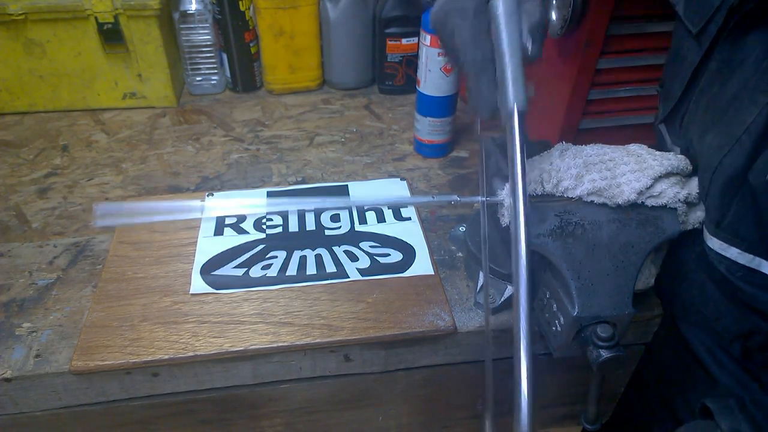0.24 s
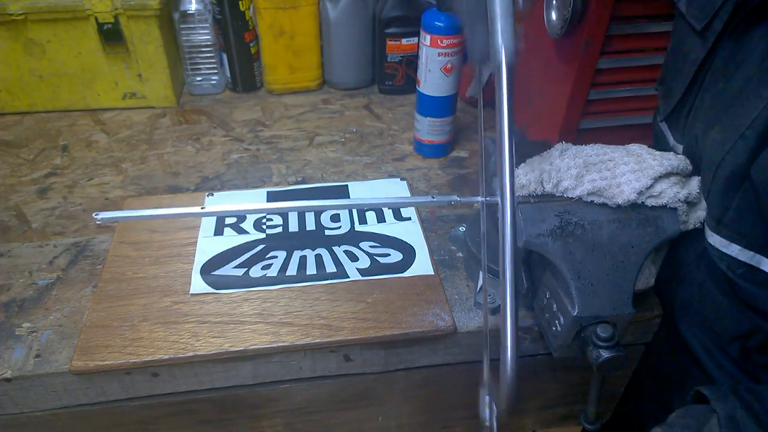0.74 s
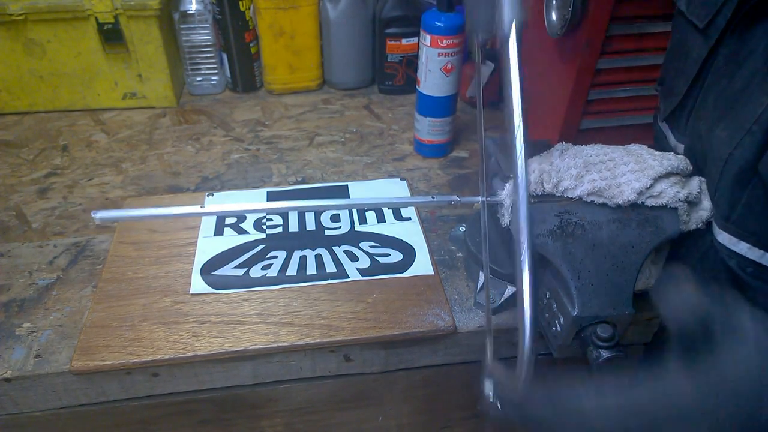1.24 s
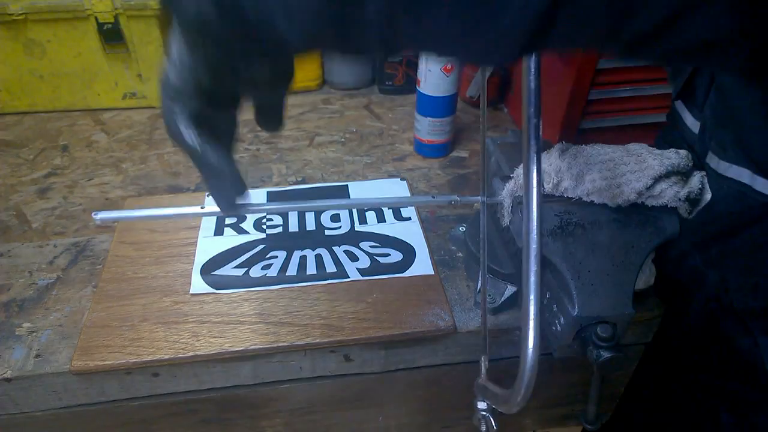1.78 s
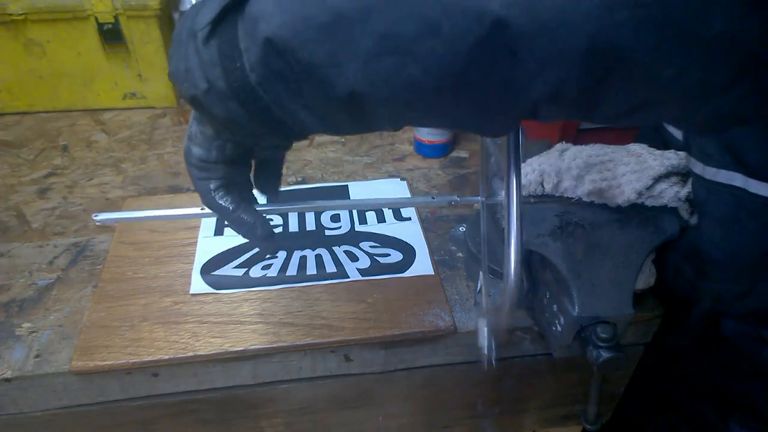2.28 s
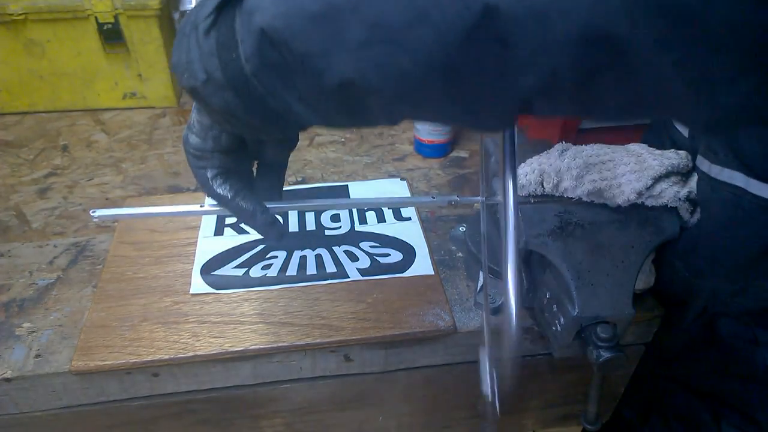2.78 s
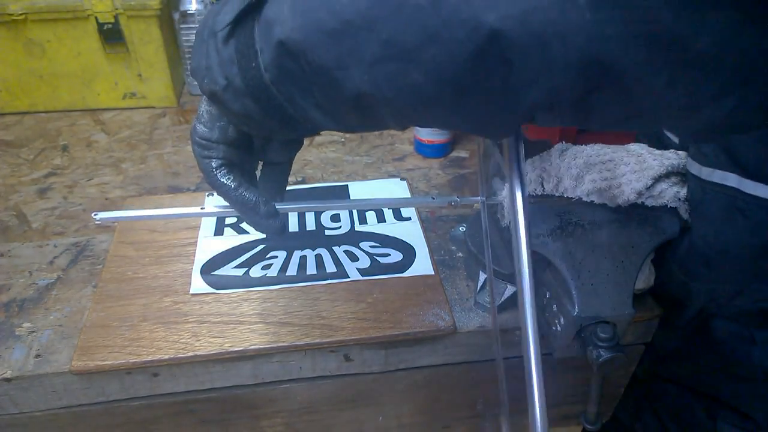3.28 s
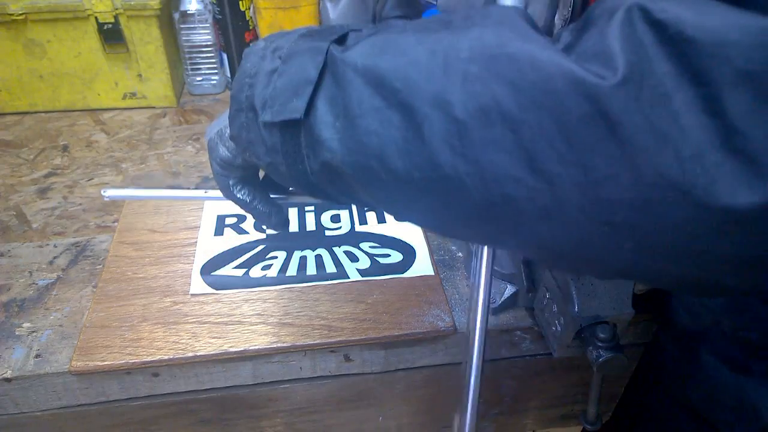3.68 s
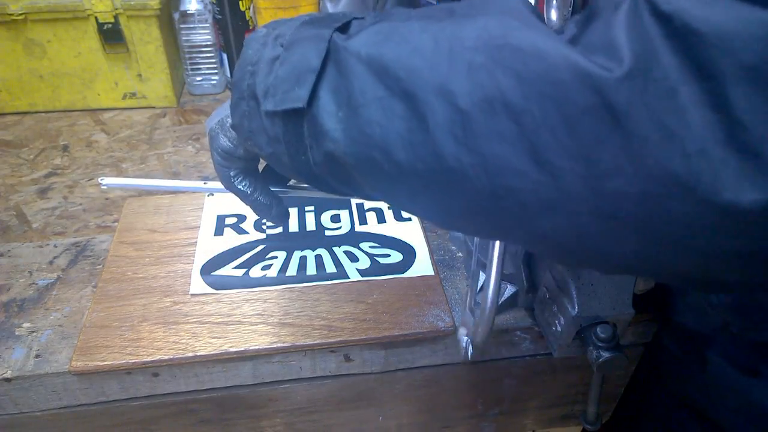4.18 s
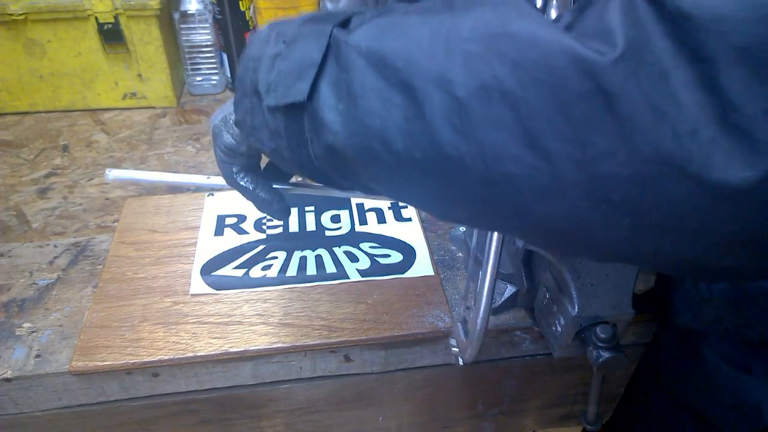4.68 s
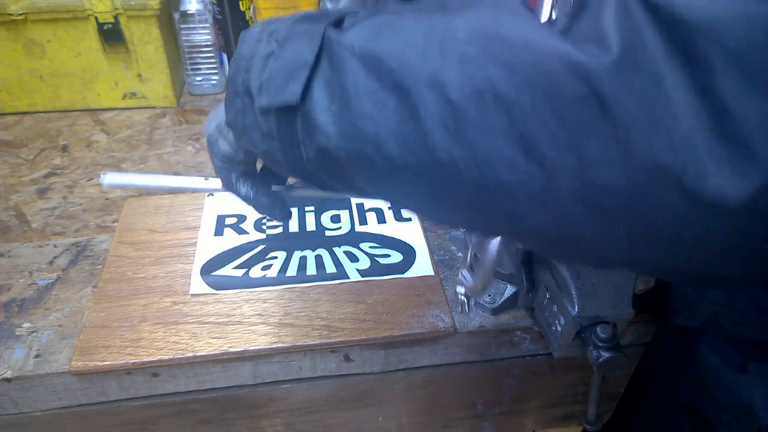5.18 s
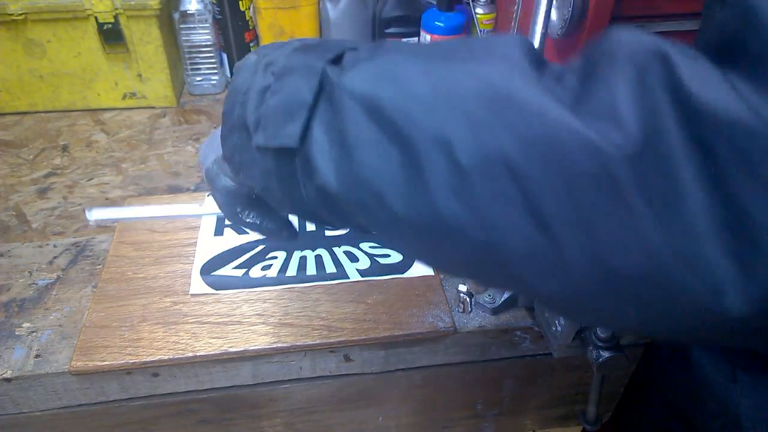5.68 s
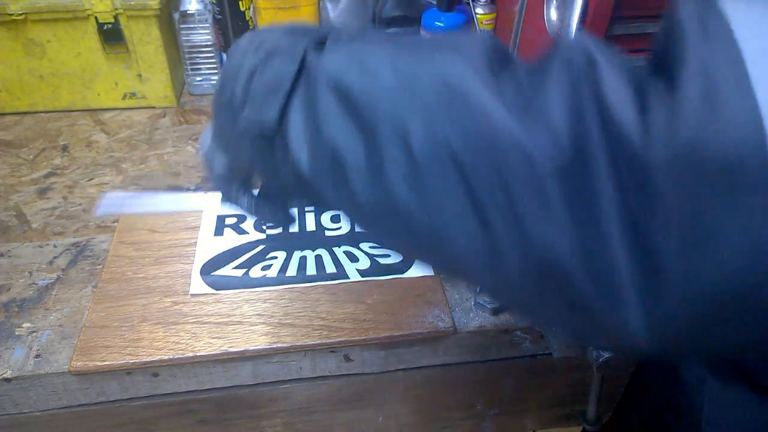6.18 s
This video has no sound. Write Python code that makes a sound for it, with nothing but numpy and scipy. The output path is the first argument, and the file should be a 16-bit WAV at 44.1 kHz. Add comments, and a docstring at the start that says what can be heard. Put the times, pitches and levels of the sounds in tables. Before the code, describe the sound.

Fast, bright metallic sawing with low bench thumps in a small workshop, a short break with cloth rustle, more strokes, then small clinks.

```python
"""A hacksaw cuts a thin aluminium rod in a bench vise, about four and a half strokes a second.
Random tooth catches over steady rubbing make one noisy force that excites blade and rod resonances.
Noise through low resonances rocks the wooden bench under the effort and hums in the vise.
The sawyer pauses to take hold of the rod, filtered noise brushing as a sleeve, and cuts through.
Decaying sines clink rod and loose end, the saw drags clear, and a short room and still air surround it."""
import sys
import numpy as np
from scipy import signal
from scipy.fft import rfft, irfft
from scipy.io import wavfile
from scipy.ndimage import uniform_filter1d

SR = 44100
rng = np.random.default_rng(int(sys.argv[2]) if len(sys.argv) > 2 else 0)


def generate_wav(signal):
    """Clip the signal to [-1, 1] and save it as 16-bit WAV at the path in sys.argv[1]."""
    frames = np.transpose(np.atleast_2d(signal))
    scaled = np.clip(frames, -1, 1) * 32767
    pcm = np.round(scaled).astype(np.int16)
    wavfile.write(sys.argv[1], SR, pcm)


N = 284002
TIME = np.arange(N) / SR  # s
FREQ = np.fft.rfftfreq(N, 1 / SR)  # Hz

# Passes of the blade. Each row: start in seconds, length in seconds, moment of top speed as a share
# of the length (0-1), drive of the blade in dB, drive of the rod in dB, fizz relative to the blade in dB.
STROKES = [(-0.005, 0.016, 0.12, -3.5, -8.5, -13.5), (0.077, .31, 0.39, -19, -26, -12),
           (0.408, 0.2, 0.4, -18, -27, -7.5), (0.618, 0.21, 0.52, -19.5, -27.5, -12),
           (0.86, 0.21, 0.34, -18.5, -27.5, -6.5), (1.108, 0.15, 0.38, -19.5, -25, -11.5),
           (1.301, 0.39, 0.16, -34.5, -38, -5), (1.814, .1, 0.48, -21, -31.5, -7),
           (1.924, 0.27, 0.58, -27.5, -31.5, -9.5), (2.211, .18, 0.51, -22.5, -31, -13),
           (2.476, 0.16, 0.29, -22.5, -27.5, -10), (2.661, 0.19, 0.53, -24.5, -32.5, -9),
           (2.924, 0.13, 0.23, -19.5, -26.5, -10.5), (3.097, 0.18, 0.61, -23.5, -29, -10.5),
           (3.347, 0.19, 0.26, -21, -29, -10.5), (3.505, 0.088, 0.48, -28.5, -29.5, -8),
           (3.617, .15, 0.36, -23.5, -30, -8.5), (3.809, 0.21, 0, -21.5, -26.5, -10.5),
           (3.978, 0.12, 0.46, -23.5, -26, -12.5), (4.163, .1, .35, -21, -25, -10.5),
           (4.335, 0.14, 0.55, -26.5, -26.5, -8.5), (4.513, 0.07, 0.37, -28, -31, -7.5),
           (4.701, 0.22, 0, -30.5, -30.5, -9.5), (4.975, 0.15, 0.48, -52, -50.5, -7),
           (5.332, 0.19, 0.07, -63, -68, -12), (5.537, 0.075, 0.34, -51.5, -49.5, -5),
           (5.911, 0.26, 0.48, -40.5, -45, -9), (6.109, 0.13, 0.61, -35.5, -44, -5.5),
           (6.241, 0.064, 0.46, -28, -45, -8.5)]
# Shoves that jolt the bench. Each row: start in seconds, length in seconds, sway of the frame in dB,
# drumming of the top in dB, hum of the vise in dB.
JOLTS = [(-.021, 0.046, -31, -40, -13.5), (.17, 0.17, -30, -29, -28.5), (.477, 0.079, -31, -50, -17),
         (0.729, 0.053, -33, -42, -20.5), (0.976, 0.1, -17, -32, -29), (1.166, 0.12, -14, -21, -30.5),
         (1.406, 0.072, -17, -45, -29.5), (1.982, 0.08, -6, -27.5, -26.5),
         (2.134, 0.046, -36, -24.5, -26.5), (2.355, 0.068, -11.5, -26, -30.5), (2.571, 0.15, -16, -35, -39),
         (2.804, 0.054, -42, -79, -27), (3.008, 0.088, -16, -19, -28.5), (3.248, 0.066, -8.5, -27, -27.5),
         (3.395, 0.17, -23, -29.5, -26), (3.845, 0.065, -35, -14.5, -24), (4.036, 0.08, -18.5, -17, -28),
         (4.225, 0.056, 0, -27, -24.5), (4.354, 0.11, -16, -22, -31.5), (4.545, .049, -3.5, -29, -30.5),
         (4.701, 0.11, -13, -21, -26.5), (4.848, 0.055, -9.5, -32, -39), (4.962, 0.12, -20, -60, -42.5),
         (5.128, 0.035, -20, -46, -51), (6.081, .15, -22, -31, -36.5)]


def saw():
    """Forced vibration: one tooth force drives the resonances of blade, clamped rod and thinning neck."""
    # Resonances. Each row: centre in Hz, offset in Hz at which the gain has halved, relative level in dB.
    blade_modes = [(2462, 82, 0.5), (2920, 34, -3.5), (3280, 100, -0.5), (3642, 105, -4), (3673, 26.5, 3.5),
                   (4230, 74, -6.5), (5476, 140, -2.5), (6218, 265, -1), (6680, 245, -3.5)]
    sing_modes = [(5990, 114, -2.5), (6146, 130, 4.5), (6332, 43, 3.5), (8430, 177, -13), (10810, 260, -18),
                  (13740, 350, -25.5), (15500, 450, -24)]
    fizz_modes = [(8480, 750, 0.5), (9900, 92, -0.5), (10920, 350, -2.5), (14190, 44, -7)]
    rod_modes = [(470, 25, -4.5), (550, 30, -2.5), (642, 32, 0.5), (704, 23, 2.5), (784.4, 28, 4.5),
                 (864, 40, -1), (930, 42, 2), (1064, 36, -0.5), (1143, 54, -4), (1363, 43, -1.5),
                 (1494, 35, -3), (1890, 190, -9.5)]
    neck_modes = [(1198, 28, 13.5), (1291, 49, 7.5), (2040, 28, -10.5)]
    # Broad colour beneath the resonances. Each row: frequency in Hz, relative level in dB.
    blade_colour = [(1000, -59), (1700, -13), (2200, -19), (2500, -5), (3600, -3), (3900, -4.5),
                    (4600, -4.5), (6800, -10), (7300, -19), (9000, -64.5)]
    fizz_colour = [(5500, -51), (7200, -2), (7700, -9), (9000, -9), (11500, -5.5), (12200, -6),
                   (15700, -15)]
    rod_colour = [(150, -33), (300, -7), (450, -8), (850, -2), (1050, -10.5), (1400, -5), (1700, -17),
                  (2300, -14.5), (4000, -51.5)]
    # Balance as the rod is held and the cut deepens. Each row: time in seconds,
    # thin neck relative to the rod in dB, singing relative to the rest of the blade in dB.
    cut = [(0, -12, -3), (1.3, -17.5, -2), (2.1, -13.5, -1), (3.2, -22.5, -28.5), (3.7, -3.5, -3.5),
           (4.45, -3.5, -1.5), (5, -11, -25.5), (6.2, -7.5, -2.5)]
    # Teeth snagging on the edge of the cut. Each row: time in seconds, jump in force in dB.
    snags = [(1.831, 1), (2.483, 5), (3.536, 7), (6.05, 4), (6.102, 9), (6.151, 7), (6.189, 8.5),
             (6.259, 9)]
    power, release_s = 1.18, 0.04  # exponent on the arch of speed; time constant of the lag
    resting_db = -70  # the blade barely moving between strokes

    rub_rows = [(*timing, blade_db) for *timing, blade_db, _, _ in STROKES]
    bite_rows = [(*timing, blade_db + fizz_db) for *timing, blade_db, _, fizz_db in STROKES]
    rubbing = np.hypot(pushes(rub_rows, power, release_s), amp(resting_db))
    biting = pushes(bite_rows, power, release_s)
    speed = np.sqrt(rubbing / rubbing.max())  # relative, inferred from the level

    force = teeth(speed, catches_per_s=1100, spread_db=1.0, chip_s=0.00035, rub_db=6)
    snagging = 1
    for s, db in snags:
        snagging = snagging + (amp(db) - 1) * (TIME >= s) * np.exp(-abs(TIME - s) / 0.014)
    force = force * snagging

    blade = wander(body(force, blade_colour, blade_modes), patchy_db=2.5, patch_hz=220, patch_s=0.082)
    sing = wander(body(force, modes=sing_modes), patchy_db=4, patch_hz=149.3, patch_s=0.12)
    fizz = wander(body(force, fizz_colour, fizz_modes), patchy_db=2.5, patch_hz=250, patch_s=0.037)
    rod = wander(body(force, rod_colour, rod_modes), patchy_db=3.5, patch_hz=130, patch_s=0.087)
    neck = body(force, modes=neck_modes)

    neck_db, sing_db = along(cut)
    steel = (blade + amp(sing_db) * sing) / np.hypot(1, amp(sing_db))
    chips = speed ** 0.42 * fizz  # a slow blade sounds duller
    aluminium = (rod + amp(neck_db) * neck) / np.hypot(1, amp(neck_db))
    return rubbing * steel + biting * chips + pressure() * aluminium


def pressure():
    """Contact loading: how hard the teeth bear on the clamped rod, stroke by stroke."""
    rows = [(*timing, rod_db) for *timing, _, rod_db, _ in STROKES]
    return pushes(rows, power=0.9, release_s=0.045)


def teeth(speed, catches_per_s, spread_db, chip_s, rub_db):
    """Shot noise: random catches, more frequent at speed, each tear a brief chip over steady rubbing."""
    caught = rng.random(N) < catches_per_s * speed / SR
    size = amp(spread_db * np.minimum(rng.exponential(1, N), 4))
    keep = np.exp(-1 / (chip_s * SR))
    tearing = signal.lfilter([1], [1, -keep], (caught * size) ** 2)  # power decaying after each catch
    force = np.sqrt(tearing / tearing.mean() + amp(rub_db) ** 2)
    return steadied(force * noise_pair(), span=0.09)


def wander(x, patchy_db, patch_hz, patch_s):
    """Moving contact: the colour drifts in time-frequency patches as it slides along the blade."""
    hz, t, z = signal.stft(x, SR, nperseg=1024, noverlap=768)
    bins, frames = max(1, round(patch_hz / hz[1])), max(1, round(patch_s / t[1]))
    patches = uniform_filter1d(rng.standard_normal(z.shape[1:]), bins, axis=0)
    patches = unit(uniform_filter1d(patches, frames, axis=1))
    _, coloured = signal.istft(z * amp(patchy_db * patches), nperseg=1024, noverlap=768)
    return unit(coloured[:, :N])


def pushes(rows, power, release_s):
    """Lagged response: speed rises and falls in one arch a push, and the vibration follows late.

    Each row: start in seconds, length in seconds, peak as a share of the length, drive in dB."""
    drive = np.zeros(N)
    for start, length, peak, db in rows:
        during = (TIME > start) & (TIME < start + length)
        warp = np.log(0.5) / np.log(np.clip(peak, 0.05, 0.95))  # puts the top of the arch at the peak
        phase = ((TIME[during] - start) / length) ** warp
        drive[during] += amp(db) * np.sin(np.pi * phase).clip(0) ** power
    keep = np.exp(-1 / (release_s * SR))
    return signal.lfilter([1 - keep], [1, -keep], drive)


def bench():
    """Structure-borne sound: effort rocks the heavy frame, drums the wooden top and hums in the vise."""
    # Resonances. Each row: centre in Hz, offset in Hz at which the gain has halved, relative level in dB.
    frame_modes = [(29.7, 4.8, -3.5), (45.4, 17.5, 18.5), (62.5, 8.9, -2.5), (83, 21, -20)]
    top_modes = [(124.2, 17.4, 3.5), (146, 21, -10.5)]
    vise_modes = [(193.2, 9.7, -1.5), (238, 12.4, -12.5), (283.6, 9.5, -17.5)]
    # Broad colour beneath the resonances. Each row: frequency in Hz, relative level in dB.
    frame_colour = [(8, -38.5), (22, -2), (80, 11), (130, -92.5)]
    top_colour = [(50, -51.5), (105, -19), (160, -23), (260, -73)]
    vise_colour = [(110, -47), (170, -28.5), (400, -29.5), (900, -64)]
    sway_share_db, drum_share_db, hum_share_db = -1, -17, -25.5  # each part's share of the steady rocking
    grip_db = -7.5  # hum passed from the rod to the vise on every stroke

    sway_db, drum_db, hum_db = np.transpose(JOLTS)[2:]
    sway = steadied(body(noise_pair(), frame_colour, frame_modes), span=0.075)
    drum = steadied(body(noise_pair(), top_colour, top_modes), span=0.19)
    hum = steadied(body(noise_pair(), vise_colour, vise_modes), span=0.042)
    swaying = shaking(sway_db, sway_share_db)
    drumming = shaking(drum_db, drum_share_db)
    humming = np.hypot(shaking(hum_db, hum_share_db), amp(grip_db) * pressure())
    return swaying * sway + drumming * drum + humming * hum


def shaking(jolt_db, share_db):
    """Addition of powers: one bench part's level is its uneven rocking combined with the jolts."""
    # The sawyer's weight working on the bench. Each row: time in seconds,
    # level in dB of the steady rocking before a part's share is applied.
    effort = [(0, -18), (1.5, -29), (1.76, -36.5), (1.95, -26.5), (4.22, -23.5), (4.9, -23), (5.3, -40.5),
              (5.7, -50), (5.95, -57.5), (6.0, -29.5), (6.25, -33), (6.44, -55)]
    lurch_db, lurch_s = 2, 0.11  # rms depth of the uneven lurches; length of the window smoothing them
    settle_s = 0.051  # time constant of the bench coming to rest

    window = signal.windows.hann(int(lurch_s * SR))
    lurch = unit(signal.fftconvolve(rng.standard_normal(N), window, "same"))
    rocking = amp(along(effort)[0] + share_db + lurch_db * lurch)
    rows = [(start, length, 0.5, db) for (start, length, *_), db in zip(JOLTS, jolt_db)]
    return np.hypot(rocking, pushes(rows, 0.73, settle_s))


def clinks():
    """Modal ringing: a grazing contact pumps the modes of rod and stub, which chatter as they decay."""
    # The rod knocked by the blade or, once cut, by its own stub. Each row: start in seconds,
    # rod level in dB, stub level in dB, scrape level in dB, length of contact in seconds.
    contacts = [(1.411, -33, -60, -40, 0.031), (1.52, -37.5, -46, -59, 0.019),
                (5.648, -30.5, -54, -35, .031), (5.747, -35, -28.5, -46, 0.017)]
    # Free ringing. Each row: frequency in Hz, relative level in dB, 60 dB decay time in seconds.
    rod_ring = [(2230, -10.5, 0.2), (3650, 0.5, .2), (5330, 3.5, 0.22), (7040, -6, .25), (7400, -3.5, .12),
                (8970, -7.5, 0.15), (10800, -11, 0.18), (12120, -21, .22), (13520, -24, .2),
                (14560, -23, .22)]
    stub_ring = [(3080, -16, 0.47), (4925, 0, 0.28), (5335, -3, 0.32), (7800, -7, 0.28), (9530, -9.5, .22),
                 (10330, -16, 0.22), (12110, -18, .2), (13790, -23, .2)]
    # Colour of the scrape. Each row: frequency in Hz, relative level in dB.
    scrape_colour = [(300, -3), (1200, 2), (2700, -3.5), (3400, 14), (4400, 1), (6000, 11), (7500, 0.5),
                     (11000, -1), (13000, -11), (15500, -18)]

    force = teeth(1, catches_per_s=1200, spread_db=4.0, chip_s=0.00044, rub_db=-3)
    scrape = body(force, scrape_colour)
    out, t = np.zeros((2, N)), TIME[:SR // 2]
    for s, rod_db, stub_db, scrape_db, length in contacts:
        span = slice(round(s * SR), round(s * SR) + len(t))
        contact = np.sqrt(np.sin(np.pi * np.minimum(t / length, 1)).clip(0))
        rasp = np.minimum(t / 0.0057, 1) * amp(-60 * np.maximum(t - length, 0) / 0.51)
        out[:, span] += amp(scrape_db) * rasp * scrape[:, span]
        for modes, level_db in ((rod_ring, rod_db), (stub_ring, stub_db)):
            for hz, db, t60 in modes:
                swell = signal.fftconvolve(contact, amp(-60 * t / t60))[:len(t)]
                flutter = uniform_filter1d(rng.standard_normal((2, len(t))), size=160)
                chatter = 1 + 0.4 * unit(flutter)
                ring = np.sin(2 * np.pi * (hz * t + rng.random((2, 1))))
                out[:, span] += amp(level_db + db) * swell / swell.max() * chatter * ring
    return out


def sleeve():
    """Friction noise: heavy cloth brushes over the bench as the arm reaches across; near the end the saw, moved
    clear, scrapes on rod and vise with a like noise."""
    # One list per stretch of rubbing: first the arm reaching across, then the saw scraping on rod and vise as
    # it # is moved near the end. Each row: time in seconds, level in dB before a lift of 2.5 dB.
    brushes = [
        [(1.25, -42.5), (1.432, -38), (1.6, -39), (1.762, -51.5), (1.83, -42)],
        [(5.95, -78), (6.006, -54), (6.332, -53), (6.42, -55)],
    ]
    # Colour of the rubbing, cloth and the saw's late scraping alike. Each row: frequency in Hz, relative level
    # in dB.
    cloth_colour = [(150, 3), (350, -1), (600, -2), (1150, -11.5), (1500, -18), (4000, -15), (12000, -30)]

    cloth = body(teeth(0.47, catches_per_s=320, spread_db=-11, chip_s=0.0025, rub_db=7), cloth_colour)
    level = np.zeros(N)
    for rows in brushes:
        during = (TIME > rows[0][0]) * (TIME < rows[-1][0])
        level += amp(along(rows)[0] + 2.5) * during
    return cloth * uniform_filter1d(level, size=2000)


def workshop(x, early_t60, room_t60, room_db):
    """Reverberation: bench-top reflections and a short room tail, different at each microphone."""
    # Sound arriving by reflection. Each row: frequency in Hz, level relative to the direct path in dB.
    scatter = [(150, -51), (350, -14.5), (800, 2), (2000, 6.5), (15000, 0.5)]
    # Balance of the two microphones. Each row: frequency in Hz, left minus right in dB.
    balance_db = [(60, 3.5), (380, 3), (700, 1.5), (1300, 0.5), (2200, -1), (2500, -1.5), (3400, -6.5),
                  (4200, 2.5), (4900, 3), (6100, -8.5), (7200, -5), (8200, -4), (10800, -3.5),
                  (13000, -0.5), (15000, 3.5)]

    early_noise, room_noise = rng.standard_normal((2, 2, N))
    early = unit(early_noise * amp(-60 * TIME / early_t60))
    room = unit(room_noise * amp(-60 * TIME / room_t60))
    scattered = rfft(early + amp(room_db) * room)
    scattered = scattered / np.sqrt(np.mean(abs(scattered) ** 2))
    paths = 1 + amp(across(scatter)) * scattered
    # the room adds ripple but no broad colour
    paths /= np.sqrt(uniform_filter1d(abs(paths) ** 2, size=900, axis=1))
    paths *= amp(np.outer([1, -1], across(balance_db)) / 2)
    response = np.roll(irfft(paths, N), N // 2, axis=1)  # direct sound in the middle
    return signal.fftconvolve(x, response, axes=1)[:, N // 2:N // 2 + N]


def still_air():
    """Ambient noise: random pressure with a fixed spectrum is the still workshop."""
    # Each row: frequency in Hz, relative level in dB per Hz.
    air_colour = [(18, -20), (30, 5), (65, -31.5), (180, -25.5), (328, -28), (1200, -31), (1440, -46.5),
                  (2250, -38), (4090, -67), (6530, -46.5), (15000, -64)]
    return amp(-49.5) * body(noise_pair(), air_colour)


def noise_pair():
    """Spatial coherence: two microphones hear a wide source alike in the bass, unrelated in the treble."""
    # Each row: frequency in Hz, likeness of the microphones (limited below to 0-1).
    likeness = [(60, 1), (130, 1.5), (290, 0.63), (640, 1), (1400, 0.23), (3000, 0)]
    left, other = rfft(rng.standard_normal((2, N)))
    alike = np.clip(across(likeness), 0, 1)
    right = alike * left + np.sqrt(1 - alike ** 2) * other
    return irfft(np.array([left, right]), N)


def body(x, broad=None, modes=()):
    """Linear filtering: a causal minimum-phase body with broad colour and resonances; rms 1."""
    power = np.zeros(len(FREQ)) if broad is None else amp(across(broad)) ** 2
    for hz, width, db in modes:
        power = power + amp(db) ** 2 / (1 + ((FREQ - hz) / width) ** 2) ** 2
    log_gain = np.log(power + 1e-10) / 2
    cepstrum = irfft(log_gain, N) * 2 * (TIME < TIME[N // 2])  # folded forward in time
    phase = rfft(cepstrum).imag
    return unit(irfft(rfft(x) * np.exp(log_gain + 1j * phase), N))


def steadied(x, span):
    """Level equalisation: dividing by the running rms evens out swells slower than span seconds."""
    window = signal.windows.hann(int(span * SR))
    power = signal.fftconvolve(np.mean(x ** 2, axis=0), window / window.sum(), "same")
    return x / np.sqrt(abs(power) + 1e-6)


def across(points):
    """Logarithmic frequency scale: reads (Hz, value) points at every frequency."""
    hz, value = np.transpose(points)
    return np.interp(np.log(FREQ + 1), np.log(hz), value)


def along(rows):
    """Linear interpolation: reads (s, value, ..) rows at every sample, one curve a column."""
    rows = np.array(rows)
    s, *columns = rows[np.argsort(rows[:, 0])].T
    return [np.interp(TIME, s, column) for column in columns]


def amp(db):
    """Level law: decibels to amplitude gain."""
    return 10 ** (np.asarray(db) / 20)


def unit(x):
    """Normalisation: scales to rms 1."""
    return x / np.sqrt(np.mean(x ** 2) + 1e-20)


def scene():
    """Superposition: work in the workshop, clinks stronger at the right microphone, and still air."""
    work = workshop(saw() + bench() + sleeve(), early_t60=0.032, room_t60=0.21, room_db=-9.5)
    clink_gain = amp([[-2], [1.5]])  # left, right
    return work + clink_gain * clinks() + still_air()


def record(dry):
    """Band limiting: a linear-phase low-pass removes the highest treble."""
    cutoff_hz = 15750
    low_pass = signal.firwin(1023, cutoff_hz, window=("kaiser", 9), fs=SR)
    return signal.oaconvolve(dry, low_pass[None], "same", axes=1)


dry = scene()
out = record(dry)
generate_wav(out)
```